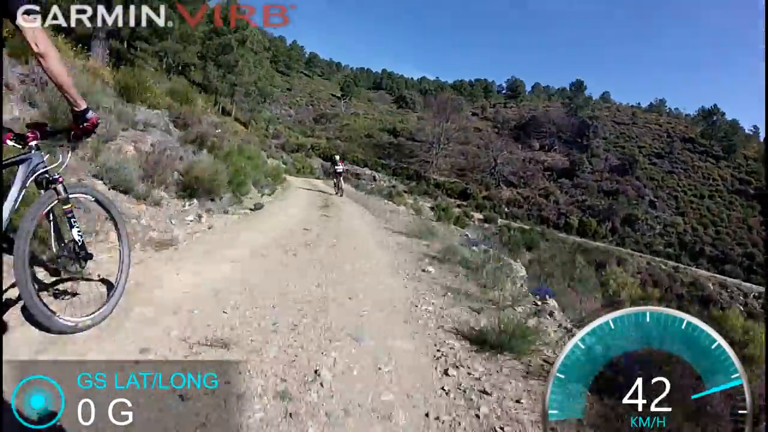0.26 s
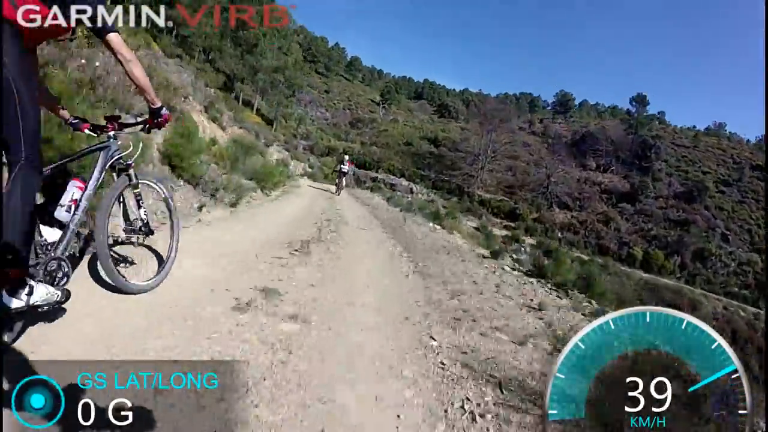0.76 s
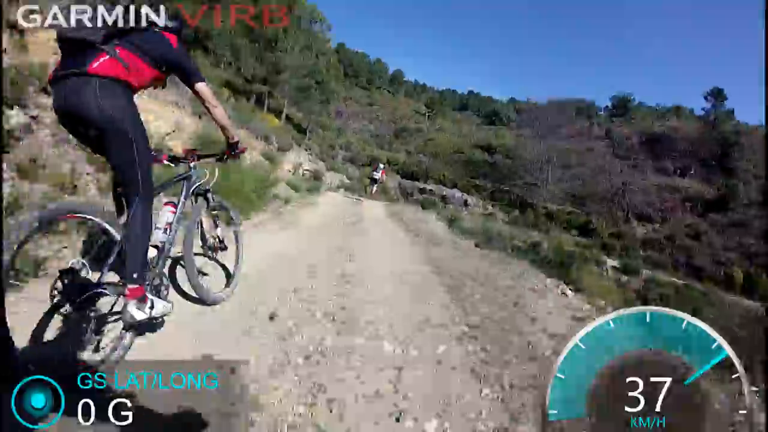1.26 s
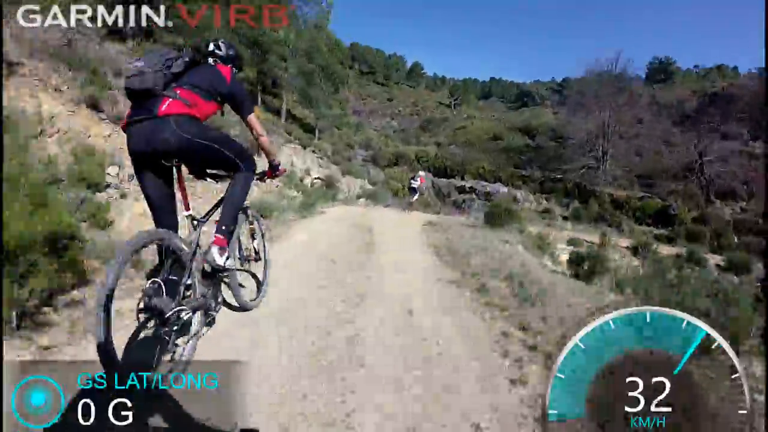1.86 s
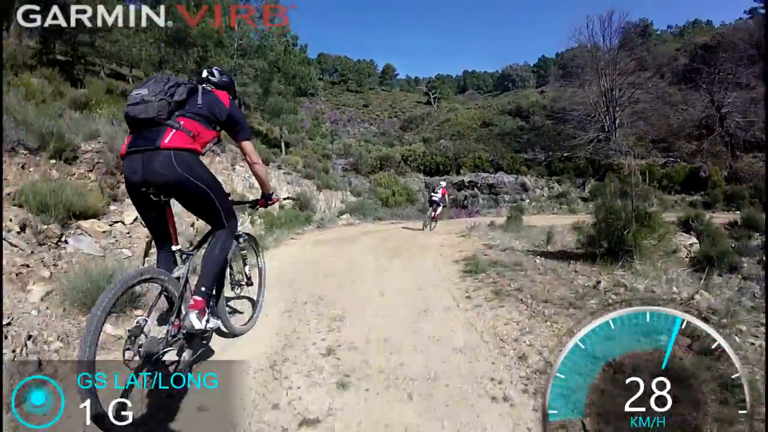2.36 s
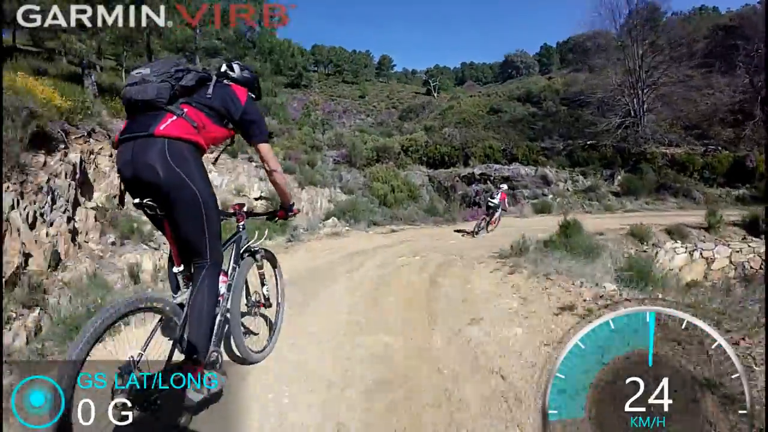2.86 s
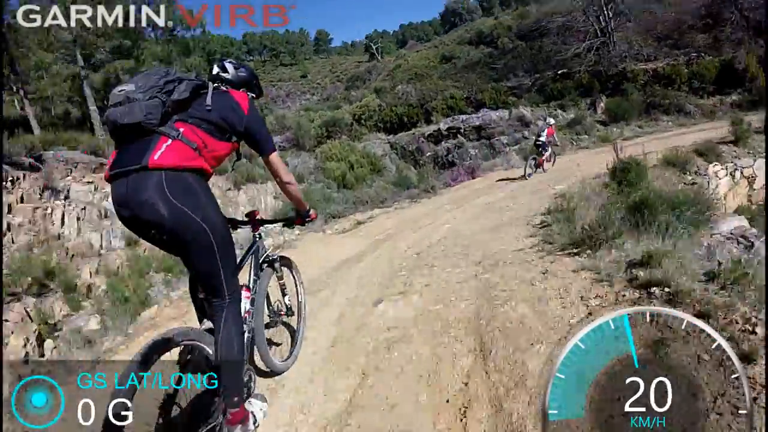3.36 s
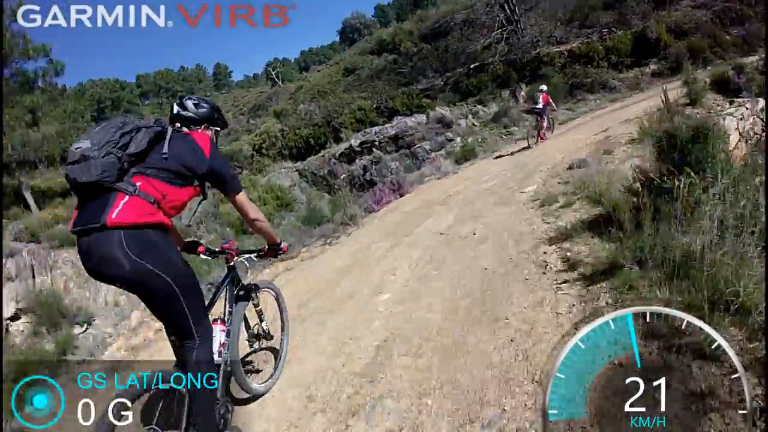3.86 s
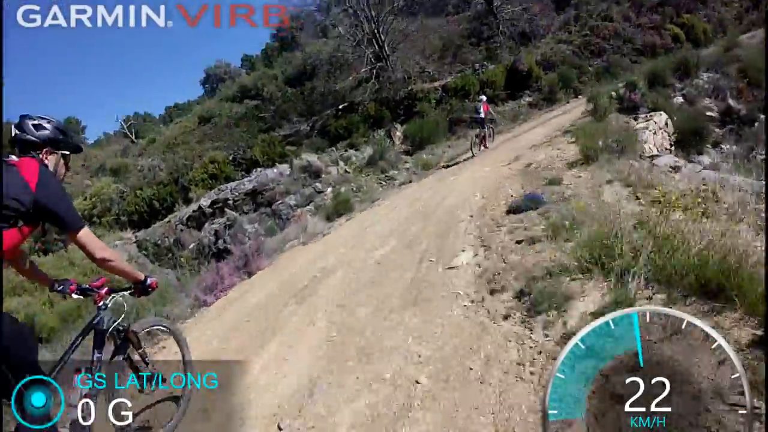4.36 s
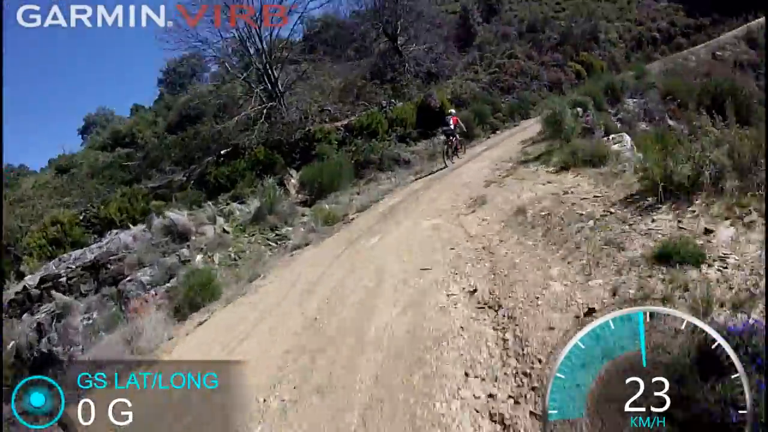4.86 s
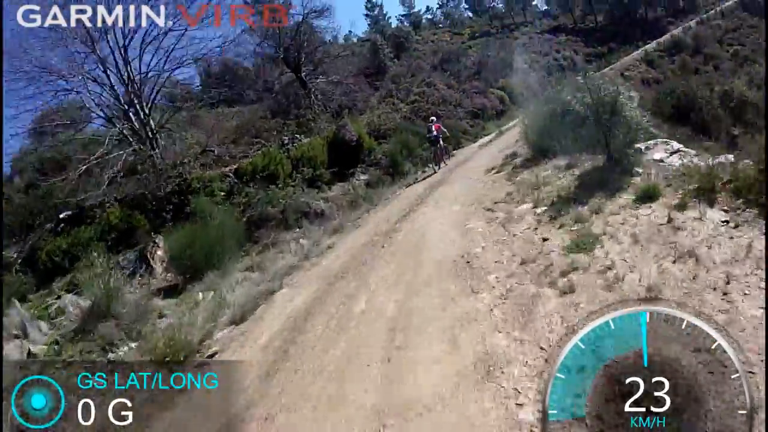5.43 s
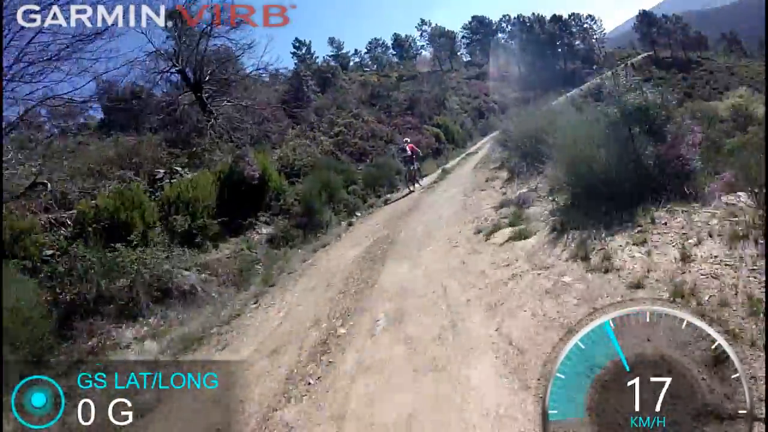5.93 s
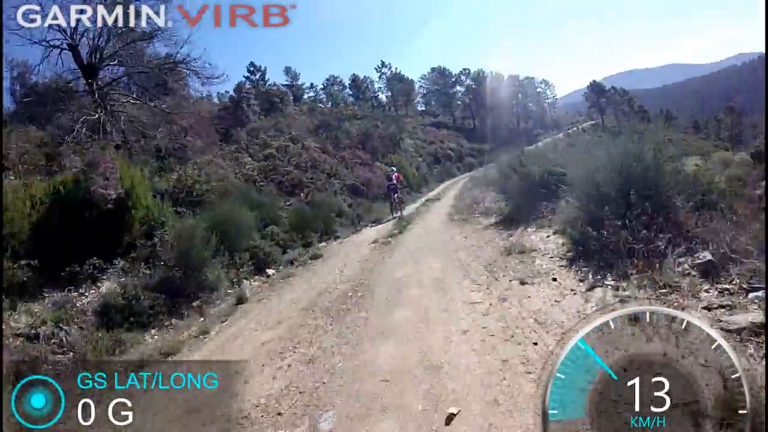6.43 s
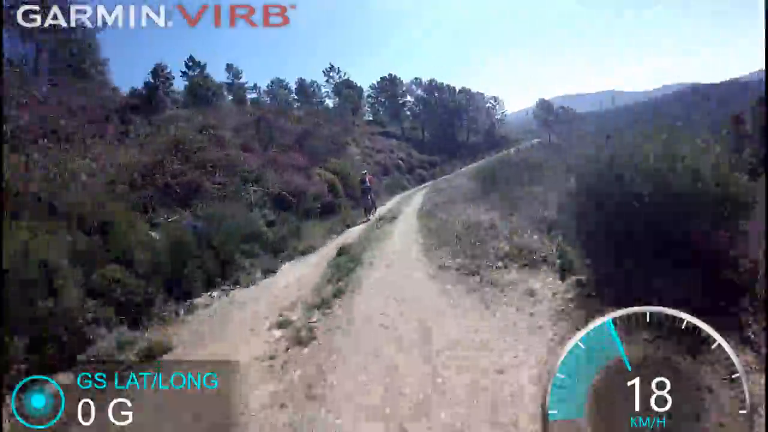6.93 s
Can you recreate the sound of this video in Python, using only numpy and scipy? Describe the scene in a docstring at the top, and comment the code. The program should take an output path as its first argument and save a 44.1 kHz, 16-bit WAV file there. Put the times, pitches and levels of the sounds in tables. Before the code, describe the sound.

Low wind rumble and crunching gravel under a coasting mountain bike, with thumping bumps, handlebar knocks and a steely clicking freewheel.

```python
"""A mountain bike rolls down a gravel track, heard up close from a camera clamped to its handlebar.
Below the microphone the tyres crunch and spray grit, stones fly against the tubes, bumps thump in the
wheels and hard knocks ring through the bar. Behind, the freewheel clicks with a steely buzz.
Under it all the clamp bounces, jolts from the ground drone in the frame and wind buffets the microphone."""
import sys
import numpy as np
from scipy import signal
from scipy.fft import rfft, irfft, next_fast_len
from scipy.io import wavfile
from scipy.ndimage import map_coordinates

SR = 44100
rng = np.random.default_rng(int(sys.argv[2]) if len(sys.argv) > 2 else 0)


def bounce(signal):
    """Save signal as a 16-bit WAV file at the path given by the first command-line argument."""
    frames = np.transpose(np.atleast_2d(signal))
    limited = np.clip(frames, -1, 1)
    pcm = np.round(limited * 32767).astype(np.int16)
    wavfile.write(sys.argv[1], SR, pcm)


N = 317079

# Wind on the microphone (time [s], level [dB])
WIND_LEVEL = [(0, -22), (1.5, -22.5), (1.8, -26.5), (2.5, -25.5), (3.3, -31), (3.9, -25), (4.4, -25.5),
              (4.8, -18.5), (5.2, -23), (5.45, -20.5), (6, -24), (6.4, -18.5), (6.7, -23), (7.19, -17)]
# Brief gusts on top of it (time [s], swell [dB])
GUST_SWELLS = [(.065, 2), (0.359, 9), (.94, 4), (2.22, 5), (2.605, 4.5), (3.27, 4.5)]
# Spectrum of the buffeting (frequency [Hz], level [dB])
WIND_SPECTRUM = [(20, -25), (40, -6.5), (100, -2.5), (135, -0.5), (154, 2.5), (180, -0.5), (250, -3),
                 (500, -11.5), (1000, -25), (2000, -62)]
# Resonance of the camera clamp (frequency [Hz], width [Hz], level [dB])
CLAMP_MODE = [(67.7, 23, 0)]
# How hard the clamp shakes (time [s], level [dB])
CLAMP_LEVEL = [(0, -34.5), (1.5, -30.5), (2.1, -35), (2.8, -28), (3.02, -38), (3.3, -24), (3.7, -28),
               (4.0, -23.5), (4.15, -22), (4.35, -21), (4.6, -25), (4.85, -22), (5.0, -33), (5.15, -38),
               (5.33, -35), (5.42, -17), (5.53, -20.5), (5.62, -24), (5.82, -29), (5.92, -20), (6.1, -37),
               (6.35, -20.5), (6.7, -33.5), (7.19, -33)]
# Frame resonances; the last two grow more on coarse ground (frequency [Hz], width [Hz], level [dB])
FRAME_MODES = [(333.1, 32.8, 3.5), (389, 52.5, 2.5), (868, 155, -8.5), (472, 130, -6), (646, 206, -9.5)]
# How coarse the track is, against average ground (time [s], level [dB])
COARSENESS = [(0, 1.5), (.2, -0.5), (.42, 2), (.7, -0.5), (1.2, -2), (1.4, 1.5), (1.53, 2), (1.6, 3),
              (1.7, -0.5), (1.9, -2), (2.4, -3.5), (2.6, 1), (2.95, -3.5), (3.5, -4), (3.95, -0.5),
              (4.08, -1), (4.24, 3), (4.48, -2.5), (4.6, 3.5), (4.7, 1), (4.85, 4.5), (5.15, -2),
              (5.45, 2.5), (5.7, 2.5), (6.05, 1.5), (6.35, 2.5), (6.42, 0), (6.5, 3.5), (6.75, -0.5),
              (7.19, -3)]
# Steel ringing while the bike coasts (time [s], level [dB])
RING_LEVEL = [(0, -56), (2.8, -54), (3.6, -58), (4.1, -55), (4.8, -49), (5.3, -49), (6, -52), (6.6, -52),
              (7.19, -57)]
# Narrow resonances of that ring (frequency [Hz], width [Hz], level [dB])
STEEL_RING_MODES = [(5140, 80, 2), (6450, 53, -13)]
# Pawls in the rear hub (time [s], rate [clicks/s], level [dB])
PAWL_CLICKS = [(0, 150, -71), (2.6, 106, -51), (3.6, 114, -42.5), (4.1, 119, -41), (4.7, 128, -40),
               (5.3, 124, -45.5), (6.5, 120, -45), (7.19, 140, -46)]
# Steel resonances that the pawls strike (frequency [Hz], width [Hz], level [dB])
FREEWHEEL_MODES = [(2890, 330, -0.5), (5220, 190, -6), (6330, 130, -9), (7760, 200, -15),
                   (8670, 130, -18.5), (10600, 260, -18.5), (11500, 460, -22.5), (12700, 560, -22)]
# The wheels hit bumps (time [s], level [dB], pitch [Hz])
BUMPS = [(0.062, -1.5, 176), (0.276, -19, 171), (0.354, -10, 143), (0.933, -16, 214), (0.979, -8, 171),
         (1.139, -22, 191), (1.21, -8, 166), (2.206, -20, 161), (2.339, -7, 152), (2.602, -10, 152),
         (3.018, -14, 164), (3.701, -9.5, 155), (3.872, -14, 161), (4.121, -6, 155), (4.246, -8, 270),
         (4.543, -8, 130), (4.897, -4.5, 159), (5.76, -9, 154.4), (6.006, -5, 165), (6.202, -4, 133),
         (6.365, -9, 117.2), (6.463, -20, 161.5), (6.8, -14, 130.7), (6.914, -13, 175), (6.982, -13, 247)]
# Blows that reach the handlebar (time [s], level [dB], hardness [dB])
BAR_BLOWS = [(0.764, -10.5, -21), (0.931, -17, -12), (1.488, -10.5, -14), (1.589, -10, -9),
             (1.728, -20, -1), (2.498, -3.5, -19), (2.668, -6.5, -2), (2.718, -6, -22), (2.743, -20, 4),
             (2.759, -7.5, 4.5), (2.778, -5, -13), (2.817, -15.5, 3), (4.029, -19.5, -0.5),
             (4.587, -3.5, -18), (4.61, -3, -25), (4.899, -10.5, -6), (4.939, -11, -10), (6.467, -2, -24),
             (6.842, -25, -10)]
# Handlebar resonances (frequency [Hz], level [dB], t60 [s])
BAR_MODES = [(380, 5, 0.061), (673, -13, 0.1), (843, 1.5, 0.068), (1203, -12, 0.077), (1536, -13, 0.043),
             (1628, -2.5, 0.044), (1850, -10, 0.04), (2510, -25, .04), (3170, -16, 0.034),
             (4300, -20, 0.026)]
# Loose parts after a blow (frequency [Hz], level [dB])
RATTLE_SPECTRUM = [(900, 4.5), (1500, -1.5), (4300, -3.5), (6000, -18), (9000, -50)]
# Stones that split under the tyre (time [s], level [dB])
STONE_SPLITS = [(0.0982, -52), (0.407, -44), (0.5696, -49), (1.1034, -46), (1.5943, -44), (1.7374, -48),
                (1.7998, -50), (2.644, -48), (2.7266, -48), (3.9978, -48), (4.1754, -45), (4.2318, -44),
                (4.568, -47), (4.7686, -45), (5.4051, -46), (5.457, -46), (5.5388, -46), (5.5812, -47),
                (5.7902, -46), (6.8019, -47)]
# Stones that hit squarely, with no ring (time [s], level [dB], pitch [Hz])
SQUARE_HITS = [(0.7945, -27, 4000), (1.3875, -19, 4200), (1.4695, -20, 4000), (1.541, -21, 2800),
               (1.5595, -22, 4300), (2.6557, -11, 3360), (2.7598, -7, 3020), (4.6128, -4.5, 3050),
               (4.831, -14, 4300), (4.8525, -18, 5200), (4.863, -15, 3200), (4.911, -16, 3500),
               (4.9401, -1.5, 3400), (5.9978, -13, 3000), (6.1355, -14, 2600), (6.317, -15, 3500),
               (6.3405, -19, 3000)]
# Stones that ring on the tubes (time [s], level [dB], pitch [Hz])
TUBE_HITS = [(0.3975, -13.5, 3670), (0.4559, -18.5, 3450), (0.774, -24, 3100), (0.870, -26, 3200),
             (1.104, -21, 4300), (1.351, -19, 3500), (1.411, -22, 3180), (1.4397, -14, 4520),
             (1.4403, -15, 2500), (1.4865, -19, 3400), (1.5025, -18, 2600), (1.566, -16, 2340),
             (1.593, -18, 3320), (1.6716, -17, 2580), (1.794, -18.5, 2060), (1.9783, -22, 3430),
             (2.075, -15.5, 2780), (2.2686, -21, 2000), (2.3645, -15.5, 2020), (2.376, -21, 5030),
             (2.473, -16, 3320), (2.509, -14.5, 2530), (2.5667, -13, 2630), (2.645, -15, 3350),
             (2.656, -13, 2600), (2.726, -17, 3400), (2.758, -11, 3180), (2.81, -15, 2240),
             (2.8424, -20, 3400), (3.677, -17.5, 3070), (3.7973, -10.5, 4450), (3.9085, -18.5, 2900),
             (3.981, -20, 2840), (3.953, -20, 4400), (4.027, -14, 2770), (4.1458, -16, 5370),
             (4.175, -15, 3240), (4.192, -19, 3400), (4.2332, -13.5, 4500), (4.3077, -13.5, 3160),
             (4.3645, -12.5, 2630), (4.4024, -16, 4440), (4.419, -14, 2480), (4.5555, -15, 2100),
             (4.5664, -12.5, 3900), (4.595, -12.5, 2370), (4.7492, -15, 2720), (4.7587, -9.5, 2560),
             (4.8777, -11, 2950), (4.8993, -15.5, 2530), (5.0883, -15, 3480), (5.113, -21, 4020),
             (5.24, -19, 3200), (5.33, -16, 3960), (5.4056, -14, 3550), (5.432, -10, 3950),
             (5.4575, -9, 3140), (5.5177, -16, 3480), (5.5457, -12.5, 3930), (5.631, -15, 3960),
             (5.712, -15.5, 3090), (5.789, -12, 3520), (5.816, -19, 2910), (5.876, -17, 2733),
             (6.3018, -22, 3400), (6.5291, -17, 3000), (6.6368, -12, 2110), (6.6794, -14.5, 3780),
             (6.701, -19, 3070), (6.79, -19, 3340), (6.801, -17.5, 4200), (7.1695, -15.5, 2050)]
# Gravel grinding under the tyres (frequency [Hz], level [dB])
GRAVEL_SPECTRUM = [(530, -19), (900, -19), (1120, -6.5), (1660, -9), (2060, -8.5), (2270, -8.5),
                   (3340, -10.5), (4400, -15.5), (7070, -25), (9500, -64), (12400, -70), (20900, -120)]
# Fine grit spraying off them (frequency [Hz], level [dB])
GRIT_SPECTRUM = [(6000, -20), (8000, 14), (9350, -32), (10300, -0.5), (11600, 8.5), (13000, 4), (15500, 4)]
# Treble roll-off of the microphone (frequency [Hz], level [dB])
MIC_RESPONSE = [(12500, 0), (13500, -8), (14500, -13), (15300, -26)]

DRONE_DB, CRUNCH_DB, SPRAY_DB = -25, -37, -55.5  # on average ground
DRONE_GROWS, CRUNCH_GROWS, SPRAY_GROWS = 1.13, 0.7, 0.63  # dB gained per dB of coarser ground


def amp(db):
    """Decibels to amplitude."""
    return 10 ** (np.asarray(db) / 20)


def unit(x):
    """x scaled to an RMS of one."""
    return x / np.sqrt(np.mean(x ** 2) + 1e-20)


def curves(rows):
    """One value per sample for each column after the time."""
    times, *columns = np.transpose(rows)
    return [np.interp(np.arange(N) / SR, times, column) for column in columns]


def wobble(rate):
    """A smooth random curve, rate knots a second."""
    knots = rng.standard_normal(int(N * rate / SR) + 4)
    return map_coordinates(knots, [np.arange(N) * rate / SR])


def filtered(x, response):
    """x through a complex response of frequency."""
    size = next_fast_len(N + SR // 2)
    return irfft(rfft(x, size) * response(np.fft.rfftfreq(size, 1 / SR)), size)[:N]


def colour(points):
    """Response through (frequency [Hz], level [dB]) points on a log axis."""
    hz, db = np.transpose(points)
    return lambda f: amp(np.interp(np.log(f + 1), np.log(hz + 1), db))


def resonant(modes):
    """Causal response of a set of resonances, alternating in sign."""
    return lambda f: sum((-1) ** k * amp(db) * 1j * f * width / (hz * hz - f * f + 1j * f * width)
                         for k, (hz, width, db) in enumerate(modes))


def jolts(rate, spread_db):
    """Random impulses, rate a second; spread_db makes a few stand out."""
    size = amp(spread_db * np.minimum(rng.exponential(size=N), 4)) * rng.standard_normal(N)
    return unit(size * (rng.random(N) < rate / SR))


def tails(impulses, fall_s):
    """Each impulse rises at once and falls away exponentially."""
    return unit(signal.lfilter([1], [1, -np.exp(-1 / (fall_s * SR))], impulses))


def strike(t, db, rise_s, t60):
    """Envelope of a hit: a quick rise, then 60 dB down in t60 seconds."""
    return amp(db - 60 * t / t60) * (1 - np.exp(-t / rise_s))


def bursts(times, levels_db, t60):
    """Puffs of noise that start at once and die in t60 seconds."""
    out, t = np.zeros(N + SR), np.arange(SR // 10) / SR
    for s, db in zip(times, levels_db):
        out[round(s * SR):][:len(t)] += strike(t, db, 0.00047, t60) * rng.standard_normal(len(t))
    return out[:N]


def wind(rise_s=0.0077, fall_s=0.043):
    """Air buffets the microphone itself: a low, uneven rumble with sudden gusts."""
    level_db, = curves(WIND_LEVEL)
    t = np.arange(N) / SR
    gust_db = sum(db * np.exp(-((t - s) / np.where(t < s, rise_s, fall_s)) ** 2)
                  for s, db in GUST_SWELLS)
    turbulence = amp(1.4 * wobble(40)) * rng.standard_normal(N)
    return amp(level_db + gust_db) * unit(filtered(turbulence, colour(WIND_SPECTRUM)))


def clamp_bounce():
    """Right under the camera, the shaken clamp keeps swinging at a low, wandering pitch."""
    level_db, = curves(CLAMP_LEVEL)
    hz = CLAMP_MODE[0][0] + 6 * wobble(12)
    swing = np.sqrt(2) * np.sin(np.cumsum(2 * np.pi * hz / SR))
    rumble = unit(filtered(rng.standard_normal(N), lambda f: resonant(CLAMP_MODE)(f) ** 2))
    return amp(level_db) * unit(1.13 * swing + rumble)


def frame_drone():
    """Jolts from the ground drone in the frame; coarse track brings out two broad modes."""
    coarse_db, = curves(COARSENESS)
    shaking = amp(2.25 * wobble(40)) * jolts(1500, spread_db=0.5)
    body = filtered(shaking, resonant(FRAME_MODES[:3]))
    broad = filtered(amp(0.53 * coarse_db) * shaking, resonant(FRAME_MODES[3:]))
    return amp(DRONE_DB + DRONE_GROWS * coarse_db) * unit(body + broad)


def steel_ring():
    """Narrow steel modes, shaken in fits, swell and fade."""
    level_db, = curves(RING_LEVEL)
    fits = amp(2.5 * wobble(30)) * jolts(900, spread_db=3.0)
    return amp(level_db) * unit(filtered(fits, resonant(STEEL_RING_MODES)))


def freewheel():
    """Back at the rear hub, pawls click with wheel speed; each steel mode flutters, high ones most."""
    rate, level_db = curves(PAWL_CLICKS)
    teeth_passed = np.floor(np.cumsum(rate * amp(0.15 * wobble(40))) / SR)
    ticks = np.diff(teeth_passed, prepend=0) * amp(0.89 * rng.standard_normal(N))
    scrapes = (tails(ticks, fall_s=0.00082) + 0.5) * rng.standard_normal(N)
    buzz = np.zeros(N)
    for hz, width, db in FREEWHEEL_MODES:
        mode = resonant([(hz, width, db)])
        skirt = resonant([(hz, 4 * width, 0)])  # keeps it quiet between the modes
        flutter = amp(hz / 3000 * wobble(26))
        buzz += flutter * filtered(scrapes, lambda f: mode(f) * skirt(f))
    return amp(level_db) * unit(buzz)


def wheel_thumps():
    """A bump gives the wheel one low push that swings out quickly."""
    out, t = np.zeros(N + SR), np.arange(SR // 10) / SR
    for s, db, hz in BUMPS:
        out[round(s * SR):][:len(t)] += strike(t, db - 5, 0.0042, t60=0.12) * np.sin(2 * np.pi * hz * t)
    return out[:N]


def bar_knocks():
    """Blows ring the bar beside the microphone; the harder, the more upper modes and loose parts sound."""
    out, t = np.zeros(N + SR), np.arange(SR // 8) / SR
    for s, db, hard_db in BAR_BLOWS:
        for hz, mode_db, t60 in BAR_MODES:
            upper = min(np.log2(hz / BAR_MODES[0][0]) / 2, 1)  # soft blows reach only the lowest modes
            level_db = db - 4.5 + mode_db + hard_db * upper + rng.normal(0, 2.2)
            envelope = strike(t, level_db, 1.53 / hz, t60)  # low modes take longer to swing up
            shiver = np.cumsum(rng.standard_normal(len(t))) * hz / 22000  # loose parts blur the ring
            out[round(s * SR):][:len(t)] += envelope * np.sin(2 * np.pi * hz * t + shiver)
    s, db, hard_db = np.transpose(BAR_BLOWS)
    rattle = bursts(s, db + hard_db - 1.5, t60=0.091)
    return out[:N] + filtered(rattle, colour(RATTLE_SPECTRUM))


def stone_snaps():
    """A stone splits under the tyre: a bright edge over a fuller, slightly slower body."""
    s, db = np.transpose(STONE_SPLITS)
    edge = colour([(8000, -24), (10000, 1), (12000, 4.5), (15000, 3)])
    body = colour([(3500, -30), (5000, 6), (7000, 3), (9000, -8), (10000, -30)])
    return filtered(bursts(s, db + 9.5, t60=0.02), edge) + filtered(bursts(s, db + 18.5, t60=0.022), body)


def stone_cracks():
    """A stone hits squarely: a dry, broad crack of a few cycles."""
    out, t = np.zeros(N + SR), np.arange(SR // 100) / SR
    for s, db, hz in SQUARE_HITS:
        phase = 2 * np.pi * hz * t
        crack = np.sin(phase) + 0.45 * np.sin(1.32 * phase) + 0.45 * np.sin(0.65 * phase)
        out[round(s * SR):][:len(t)] += strike(t, db, 0.0002, t60=0.004) * crack
    return out[:N]


def stones_on_tubes():
    """Just below the bar, each stone rings at its pitch and an overtone, inside a short crackle."""
    out, t = np.zeros(N + SR), np.arange(SR // 40) / SR
    for s, db, hz in TUBE_HITS:
        phase = 2 * np.pi * hz * t
        ring = np.sin(phase) + 0.3 * np.sin(1.3 * phase)
        out[round(s * SR):][:len(t)] += strike(t, db - 7, 0.00041, t60=0.019) * ring
    s, db, _ = np.transpose(TUBE_HITS)
    crackle = colour([(800, -18), (1600, 2), (4500, 3.5), (6500, -11), (9000, -51)])
    return out[:N] + filtered(bursts(s, db - 4.5, t60=0.023), crackle)


def pebble_pings(count, centre_hz, log_spread, decay_cycles, spread_db):
    """Small stones, each a short damped tone of its own pitch."""
    when, softness, _ = rng.random((count, 3)).T[:, :, None]
    hz = np.clip(centre_hz * np.exp(log_spread * rng.standard_normal((count, 1))), 900, 6000)
    t = np.arange(256) / SR
    gain = amp(-spread_db * np.log(softness + 0.017))
    envelope = np.exp(-t * hz / decay_cycles) * (1 - np.exp(-t / 0.000098))
    tones = gain * envelope * np.sin(2 * np.pi * hz * t)
    at = (when * N).astype(int) + np.arange(len(t))
    return unit(np.bincount(at.ravel(), tones.ravel(), N + len(t))[:N])


def tyres():
    """Down on the track, tyres break through patches of stones and spray fine grit in sharp spits."""
    coarse_db, = curves(COARSENESS)
    patches = tails(np.abs(jolts(160, spread_db=1.5)), fall_s=0.007)
    grains = amp(1.2 * wobble(14)) * (patches + 1.9) * jolts(9000, spread_db=0.2)
    grind = unit(filtered(grains, colour(GRAVEL_SPECTRUM)))
    pings = pebble_pings(count=1600, centre_hz=3454, log_spread=0.28, decay_cycles=7.5, spread_db=2.0)
    crunch = amp(CRUNCH_DB + CRUNCH_GROWS * coarse_db) * (grind + 0.45 * pings)
    spits = tails(np.abs(jolts(200, spread_db=6.0)), fall_s=0.0033) + 0.43 * patches + 1.0
    spray = unit(filtered(spits * rng.standard_normal(N), colour(GRIT_SPECTRUM)))
    return crunch + amp(SPRAY_DB + SPRAY_GROWS * coarse_db) * spray


def scene():
    """Everything reaches the one microphone on the handlebar."""
    rolling = clamp_bounce() + wind() + frame_drone() + tyres() + freewheel()
    hits = stones_on_tubes() + stone_cracks() + stone_snaps() + bar_knocks() + wheel_thumps()
    return (rolling + hits + steel_ring())[None]


def record(dry):
    """The microphone fades above 12.5 kHz; the camera keeps nothing above 15.3 kHz."""
    return filtered(dry[0], lambda hz: colour(MIC_RESPONSE)(hz) * (hz < 15300))[None]


dry = scene()
out = record(dry)
bounce(out)
```